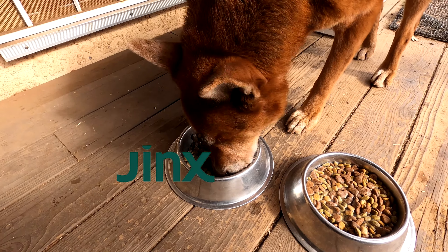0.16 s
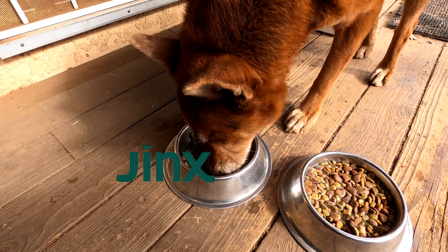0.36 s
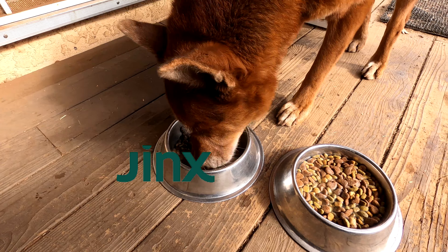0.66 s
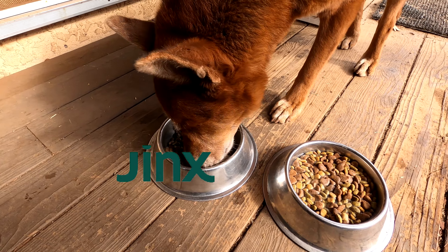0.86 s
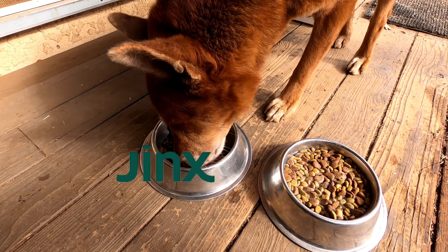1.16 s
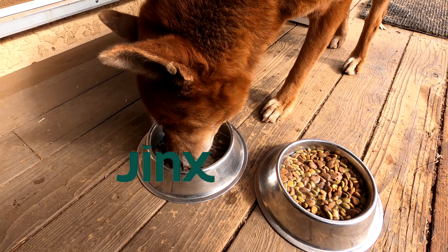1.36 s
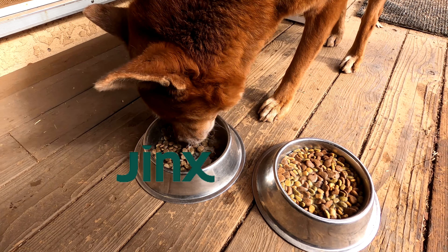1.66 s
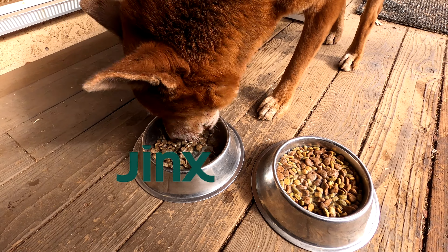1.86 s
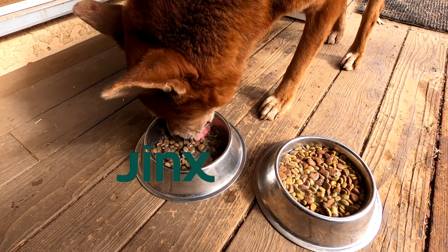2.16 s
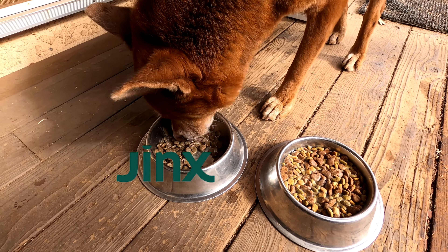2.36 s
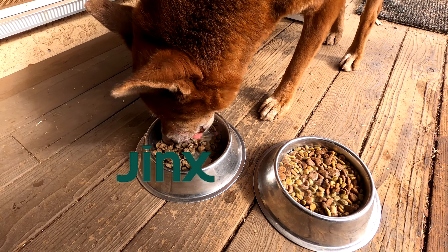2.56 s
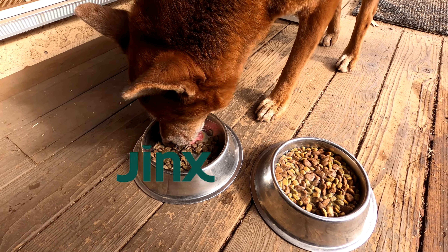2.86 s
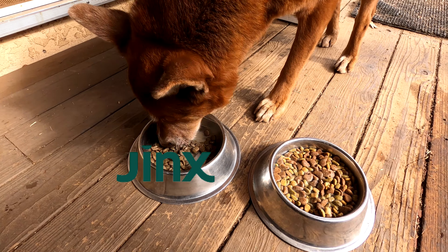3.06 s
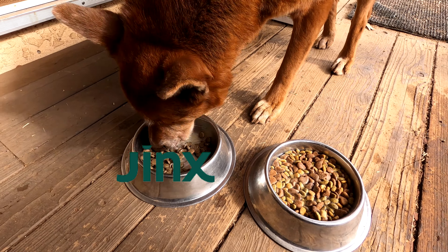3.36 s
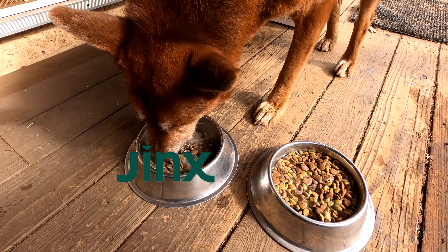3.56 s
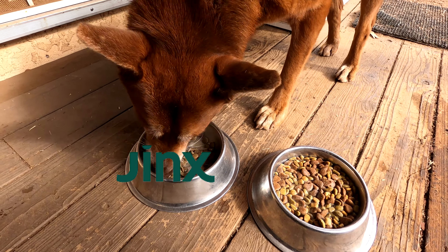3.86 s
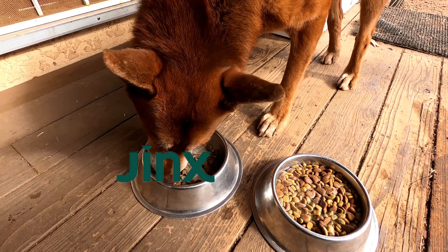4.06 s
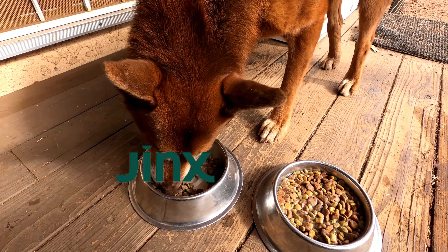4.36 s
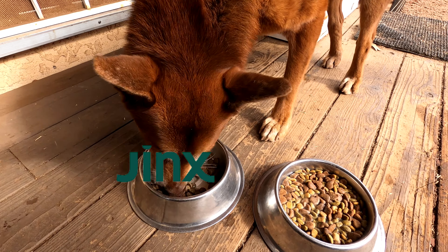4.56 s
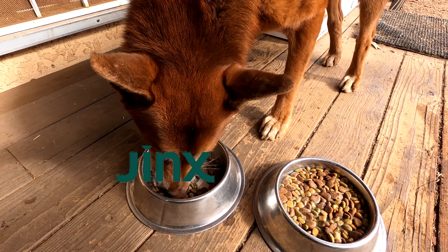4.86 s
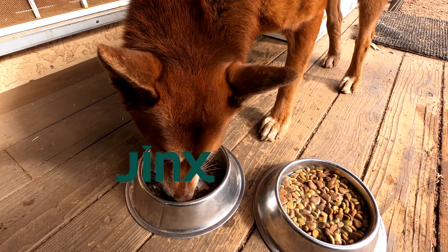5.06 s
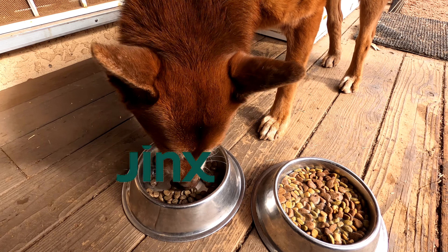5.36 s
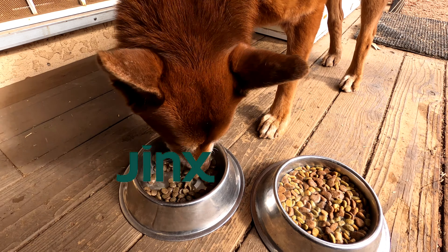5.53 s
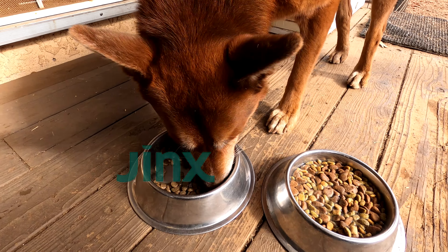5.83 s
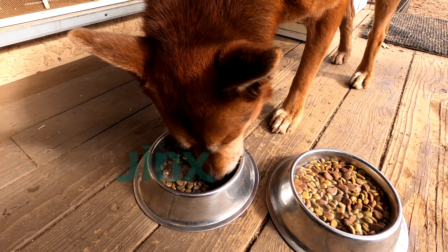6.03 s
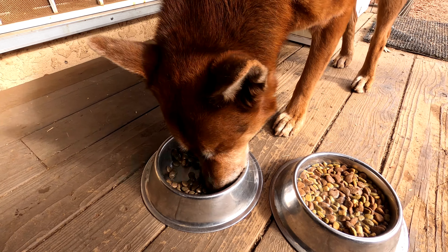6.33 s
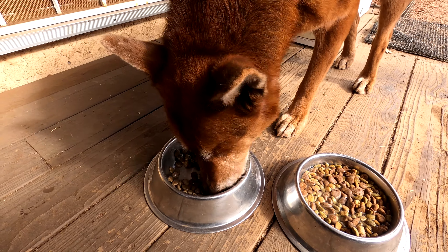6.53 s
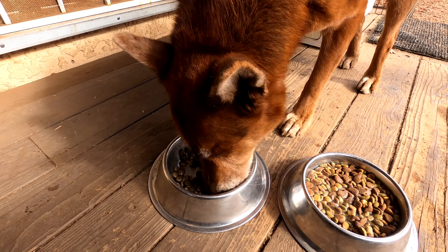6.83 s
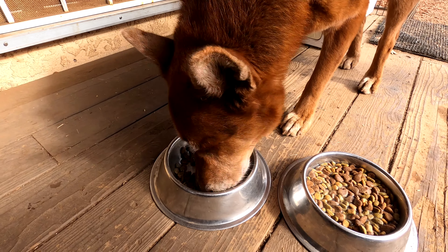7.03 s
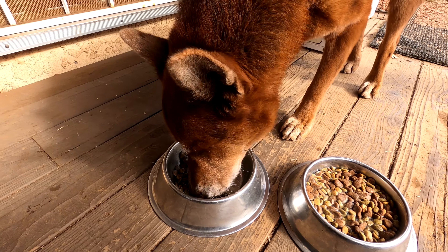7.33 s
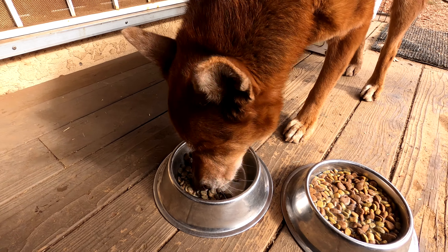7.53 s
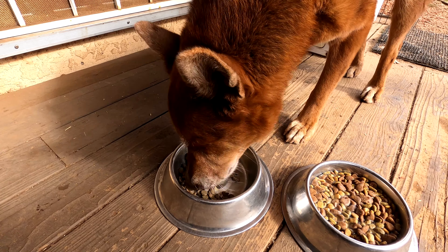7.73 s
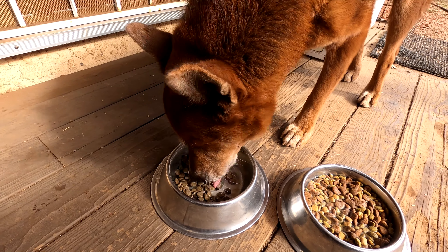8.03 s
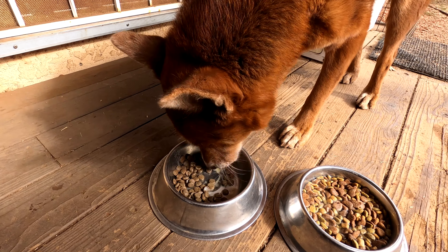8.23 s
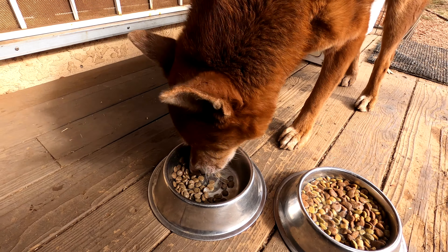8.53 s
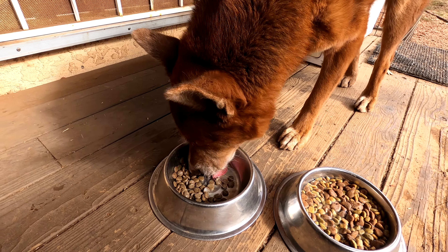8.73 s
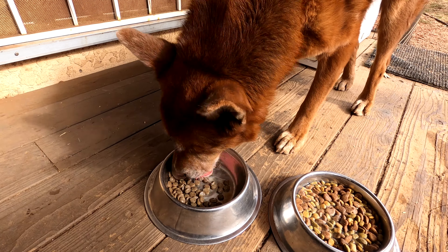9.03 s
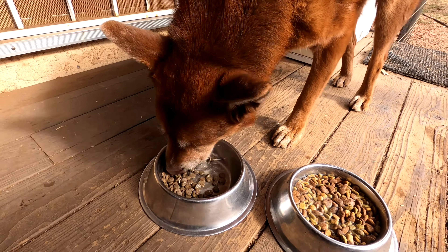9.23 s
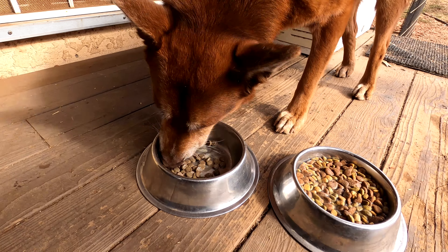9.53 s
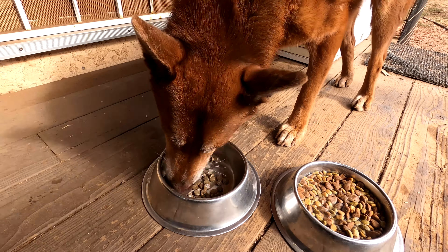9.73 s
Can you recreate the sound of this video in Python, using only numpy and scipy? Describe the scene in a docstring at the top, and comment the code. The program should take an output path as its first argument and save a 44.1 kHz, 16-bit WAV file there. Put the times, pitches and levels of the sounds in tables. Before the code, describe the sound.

Steady, dense chewing at three or four strokes a second, close to the microphone: crushed wet pellets, smacks, brief squeaks and tooth knocks. The dog snuffles into its metal bowl and nudges it softly against the boards. From about five seconds occasional small metallic scrapes appear. Quiet hum and open air continue behind, while draughts swell as deep rumble, strongest near the end.

```python
"""Under everything lie a machine hum, outdoor air and the rumble of a draught on a close microphone.
A dog is already chewing moist kibble from a steel bowl: jaw strokes crunch soaked pellets and fizz saliva.
Soon wet food squeaks, the mouth cavity pops, pellets snap, saliva films tick and teeth knock through pellets.
After a second the nose puffs into the bowl, then the muzzle bumps bowl and boards; later, teeth scrape steel.
The steel rings faintly along with mouth and nose, and muzzle, bowl and deck scatter the dog's sounds."""
import sys
import numpy as np
from scipy import signal
from scipy.fft import rfft, irfft, next_fast_len
from scipy.io import wavfile
from scipy.ndimage import uniform_filter1d

SR = 44100
rng = np.random.default_rng(int(sys.argv[2]) if len(sys.argv) > 2 else 0)


def log_audio(samples):
    """Write samples as a 16-bit WAV file to the path given in sys.argv[1]."""
    # one column per channel
    frames = np.atleast_2d(samples).T
    # limit to full scale, then quantise
    limited = np.clip(frames, -1, 1)
    pcm = np.round(limited * 32767).astype(np.int16)
    wavfile.write(sys.argv[1], SR, pcm)


N = 436149
BLOW = np.arange(SR // 5) / SR  # time axis of one short event (s)
ATTACK = int(.008 * SR)  # the stretch that sets the level of a blow (samples)


def undb(db):
    """Decibels to gain."""
    return 10 ** (np.asarray(db) / 20)


def unit(x):
    """Scale to rms 1."""
    return x / np.sqrt(np.mean(x ** 2) + 1e-20)


def strike(x, db):
    """Scale a blow so that its first 8 ms have the given rms level."""
    return x * undb(db) / np.sqrt(np.mean(x[:ATTACK] ** 2) + 1e-20)


def add(out, s, x):
    """Mix x into out at time s."""
    i = int(np.clip(s * SR, 0, N - 1))
    out[i:i + len(x)] += x[:N - i]


def resonate(x, hz, q):
    """Two-pole resonance with gain 1 at its centre."""
    w = 2 * np.pi * min(hz, SR / 2 - 2000) / SR
    a = np.sin(w) / (2 * q)
    return signal.lfilter([a, 0, -a], [1 + a, -2 * np.cos(w), 1 - a], x + 1e-18)


def resonate_twice(x, hz, q):
    """The same resonance passed twice, for steeper sides."""
    return resonate(resonate(x, hz, q), hz, q)


def colour(x, points):
    """Shape x by a (Hz, dB) spectrum; rms 1."""
    hz, db = np.transpose(points)
    size = next_fast_len(len(x))
    f = np.maximum(np.arange(size // 2 + 1) * SR / size, .1)
    low_cut = np.minimum(f / hz[0], 1) ** 2
    gain = undb(np.interp(np.log(f), np.log(hz), db)) * low_cut
    return unit(irfft(rfft(x, size) * gain, size)[:len(x)])


def fade(t, t60):
    """Exponential decay, 60 dB in t60 seconds."""
    return np.exp(-np.log(1000) * t / t60)


def swell(t, rise, t60):
    """A force that builds over `rise` seconds and dies away."""
    return (1 - np.exp(-t / rise)) ** 2 * fade(t, t60)


def burst(t60):
    """A short dying spray of noise."""
    return rng.standard_normal(len(BLOW)) * fade(BLOW, t60)


def walk(rate):
    """Slow chance with a spread near 1, about `rate` new values a second."""
    k = int(SR / rate)
    return uniform_filter1d(np.repeat(rng.standard_normal(N // k + 1), k), k)[:N]


def grains(spectrum, rate, rise, t60, width, spread_db, count=5000, size=900):
    """A cloud of at most `count` wet bursts, each with its own time, pitch, loudness and length; rms 1."""
    hz, db = np.transpose(spectrum)
    used = min(int(rate * N / SR), count)
    when, where = rng.random((count, 2))[:used].T
    loud, slow, wide = np.clip(rng.standard_normal((count, 3))[:used].T, -2, 2)
    pitch = hz[0] * (hz[-1] / hz[0]) ** where
    # every burst fills its own band, some narrow and bubble-like, some broad
    octaves = np.log2(np.arange(1, size // 2 + 2) * SR / size / pitch[:, None])
    own_width = width * np.exp(.5 * wide[:, None])
    band = 1 / (1 + (octaves / own_width) ** 2) ** 2
    noise = irfft(rfft(rng.standard_normal((count, size))[:used]) * band)
    bursts = noise * swell(np.arange(size) / SR / np.exp(0.49 * slow[:, None]), rise, t60)
    gains = undb(np.interp(pitch, hz, db) + spread_db * loud) / np.linalg.norm(bursts, axis=1)
    out = np.zeros(N)
    for share, gain, one in zip(when, gains, bursts):
        add(out, share * N / SR, gain * one)
    return unit(out)


def sprinkle(rate, level_db, hz, spread_db, octaves, count=300):
    """Chance events that follow a level curve: rows of (start_s, level_db, pitch_hz)."""
    used = min(int(rate * N / SR), count)
    when, loud, pitch = rng.random((count, 3))[:used].T
    at = (when * N).astype(int)
    level = level_db[at] + spread_db * (2 * loud - 1)
    return np.column_stack([at / SR, level, hz * 2 ** (octaves * (2 * pitch - 1))])


def muffle(x, top_hz):
    """Low-pass: closed lips take off the treble."""
    return signal.sosfilt(signal.butter(2, min(top_hz, SR / 3), fs=SR, output="sos"), x)


# partials of the machine hum: pitch_hz [Hz], level_db [dB]
HUM_PARTIALS = [(100.6, -58), (120, -62.5), (150.9, -53), (201.3, -100), (302, -66)]
# relative spectrum of the outdoor air: pitch_hz [Hz], level_db [dB]
AIR_SPECTRUM = [(50, -9), (70, -25.5), (95, -14.5), (135, -22.5), (190, -20.5), (250, -19), (400, -29.5),
                (600, -38), (870, -30), (1300, -42), (2100, -46.5), (8300, -54), (10500, -55), (15500, -57)]


def background(air_db=-50, waver_db=1.0):
    """Hum partials wander slightly in level and phase over a bed of outdoor air noise."""
    t = np.arange(N) / SR
    hum = 0
    for hz, db in HUM_PARTIALS:
        level = np.sqrt(2) * undb(db + waver_db * walk(3.7))
        hum = hum + level * np.sin(2 * np.pi * hz * t + 1.0 * walk(2.085))
    air = undb(air_db + 1.6 * walk(3.8)) * colour(rng.standard_normal(N), AIR_SPECTRUM)
    return hum + air


# draught on the microphone, joined by straight lines: time_s [s], rumble_db [dB]
DRAUGHT_LEVEL = [(0, -43), (1.5, -33.5), (2.6, -50), (3.4, -37.5), (4.4, -30), (5.1, -44.5), (6.2, -37),
                 (7.3, -38), (8.3, -42), (9.0, -22), (9.88, -27.5)]
# gusts that buffet the microphone: peak_s [s], length_s [s], rumble_db [dB]
GUST_EVENTS = [(3.896, 0.098, -24), (4.44, 0.72, -31), (5.632, 0.41, -30.5), (6.244, 0.37, -18.5),
               (6.934, 0.17, -20), (8.669, 0.09, -20.5), (9.434, 0.16, -34)]
# relative spectrum of the rumble: pitch_hz [Hz], level_db [dB]
RUMBLE_SPECTRUM = [(13, -6), (20, 1), (34, -3), (41, -7), (50, -21), (80, -35), (150, -50), (400, -90),
                   (2000, -160)]
# relative spectrum of the slow pressure sway: pitch_hz [Hz], level_db [dB]
SWAY_SPECTRUM = [(1, -6), (6, 1.5), (9, 5.5), (11, 6), (15, -13), (30, -98), (300, -180)]


def draught(sway_db=-18.0):
    """Moving air rumbles on the microphone and swells in gusts, over a slow sway of pressure."""
    time_s, rumble_db = np.transpose(DRAUGHT_LEVEL)
    push = undb(np.interp(np.arange(N) / SR, time_s, rumble_db))
    for s, length, db in GUST_EVENTS:
        add(push, s - length / 2, undb(db) * np.hanning(int(length * SR)))
    rumble = push * colour(rng.standard_normal(N), RUMBLE_SPECTRUM)
    return rumble + undb(sway_db) * colour(rng.standard_normal(N), SWAY_SPECTRUM)


# jaw strokes, three or four a second, each lasting until the next:
# start_s [s], hardest_press_s [s], crunch_db [dB], wet_fizz_db [dB]
JAW_STROKES = [(-0.1, 0, -49, -57), (0.103, 0.25, -51, -62), (0.422, 0.532, -49.5, -59),
               (0.727, 0.792, -48, -61.5), (1.062, 1.172, -52, -61.5), (1.391, 1.438, -49, -56.5),
               (1.684, 1.71, -50, -59.5), (1.984, 2.03, -63, -63.5), (2.218, 2.3, -55.5, -61.5),
               (2.362, 2.51, -51, -58.5), (2.67, 2.95, -51.5, -58.5), (3.042, 3.196, -54, -63),
               (3.35, 3.444, -51, -60.5), (3.641, 3.716, -51, -57.5), (3.97, 4.153, -53.5, -61),
               (4.307, 4.393, -49, -64), (4.59, 4.668, -50, -67), (4.895, 5, -50.5, -60.5),
               (5.194, 5.303, -50.5, -68), (5.436, 5.53, -58.5, -66.5), (5.62, 5.74, -50, -58),
               (6.029, 6.165, -50, -64), (6.25, 6.51, -53.5, -62.5), (6.576, 6.644, -47.5, -63),
               (6.922, 6.94, -47.5, -64), (7.218, 7.272, -48.5, -63.5), (7.52, 7.61, -54.5, -59),
               (7.824, 7.877, -46, -65), (8.252, 8.298, -51, -61), (8.492, 8.688, -56, -61.5),
               (8.692, 8.72, -54, -56.5), (8.904, 9.04, -51, -60.5), (9.21, 9.357, -47, -57),
               (9.507, 9.575, -49, -58), (9.812, 9.883, -60, -53)]


def jaw(attack_s=0.02, release_s=0.039, build_db_per_s=18.5, slacken_db_per_s=35, pause_db=-14.5):
    """Crunch and fizz levels (dB): a stroke grips, builds to its hardest press, slackens and lets go."""
    t = np.arange(N) / SR
    start, press, crunch_db, wet_db = np.transpose(JAW_STROKES)
    k = np.clip(np.searchsorted(start, t) - 1, 0, len(start) - 1)
    since = t - start[k]
    left = np.append(start[1:], np.inf)[k] - t
    grip = np.clip(np.minimum(since / attack_s, left / release_s), 0, 1)
    slack_db = np.maximum(build_db_per_s * (press[k] - t), slacken_db_per_s * (t - press[k]))
    shape_db = pause_db * (1 - grip) - slack_db
    return crunch_db[k] + shape_db, wet_db[k] + shape_db


def debris(rate=600, spread_db=1.5, clump_db=1.5, clumps_per_s=55):
    """Tiny broad-band fractures of the pellets' dry cores, gathered in loud and soft clumps; rms 1."""
    spectrum = [(600, 1.5), (1000, -4), (2500, -7), (4000, -15.5), (5500, -32.0), (8500, -9),
                (10500, -28.5), (15000, -36)]  # (Hz, dB)
    size = undb(spread_db * np.minimum(rng.exponential(size=N), 4))
    cracks = (rng.random(N) < rate / SR) * size * rng.choice([-1, 1], N)
    cracks = cracks * undb(clump_db * np.clip(walk(clumps_per_s), -2, 1))
    return colour(cracks, spectrum)


def chewing(effort_db, wet_db, debris_db=-1.5, debris_share=0.3):
    """Soaked pellets shift and crush, shedding debris, under a finer fizz of saliva bubbles."""
    pellets = [(520, 6.0), (850, 2.5), (1300, -4.5), (1800, -3.0), (2800, -12.5), (4200, -21.0)]  # (Hz, dB)
    bubbles = [(3300, 14.5), (5300, 12.5), (7000, 9.0), (8600, 12.5), (10500, -16), (13000, 15.0),
               (15000, 13)]  # (Hz, dB)
    crunch = grains(pellets, rate=220, rise=0.00052, t60=0.016, width=0.45, spread_db=8.0)
    fizz = grains(bubbles, rate=520, rise=0.00056, t60=0.034, width=0.33, spread_db=9.0)
    breaking_db = debris_share * effort_db + (1 - debris_share) * wet_db
    breaking = debris() * undb(breaking_db + debris_db)
    return crunch * undb(effort_db) + fizz * undb(wet_db) + breaking


def rustle(effort_db, level_db=-7.0, follow=0.65, usual_db=-52):
    """Loose pellets slide over one another around the muzzle; they keep settling between the strokes."""
    rubbing = [(750, -0.5), (1500, 1.5), (2300, 3), (3500, -2.5), (5200, -9.5), (6500, -0.5)]  # (Hz, dB)
    sliding = grains(rubbing, rate=500, rise=0.0015, t60=0.052, width=0.55, spread_db=6.0)
    return sliding * undb(usual_db + follow * (effort_db - usual_db) + level_db)


# wet food squeezed between tongue and steel: start_s [s], length_s [s], pitch_hz [Hz], level_db [dB]
SQUELCH_EVENTS = [(0.244, 0.0064, 3770, -40.5), (0.548, 0.03, 3690, -48.5), (2.83, 0.035, 2450, -57),
                  (3.692, 0.02, 4300, -66), (4.504, 0.034, 3750, -58), (7.658, 0.016, 5120, -43),
                  (7.659, 0.024, 2690, -50), (7.716, 0.03, 5160, -53.5), (8.012, 0.18, 5300, -70),
                  (8.305, 0.007, 1763, -25.5), (8.317, 0.0086, 1910, -55), (9.641, 0.0055, 3820, -38)]


def squelches(wander=0.16, wander_hz=600):
    """Wet food squeaks on a wavering pitch as it is squeezed."""
    out = np.zeros(N)
    for s, length, hz, db in SQUELCH_EVENTS:
        drift = unit(resonate(rng.standard_normal(len(BLOW)), wander_hz, 0.27))
        squeak = np.sqrt(2) * np.sin(2 * np.pi * np.cumsum(hz * (1 + wander * drift)) / SR)
        size = min(int(length * SR), len(BLOW))
        add(out, s, undb(db) * signal.windows.tukey(size, .5) * squeak[:size])
    return out


# the loudest bites and smacks, levels before the trims in bites():
# start_s [s], pop_db [dB], mouth_hz [Hz], snap_db [dB], snap_hz [Hz]
LOUD_BITES = [(0.3434, -73, 294, -50, 3270), (0.44, -46, 1010, -64, 2780), (0.5056, -35, 710, -49.5, 3230),
              (0.555, -39, 1570, -55, 3680), (0.568, -44, 560, -49, 4400), (0.622, -40.5, 1600, -68, 2500),
              (0.689, -41.5, 940, -62, 2510), (0.758, -43, 930, -52, 2500), (0.771, -32, 960, -71, 2600),
              (0.7832, -35.5, 930, -66, 2500), (0.7963, -36.5, 690, -45.5, 4300),
              (0.8571, -34, 1010, -56, 2080), (0.985, -36, 970, -74, 2480), (1.131, -45, 900, -45, 3060),
              (1.171, -55, 1830, -42.5, 2630), (1.2593, -49, 900, -52.5, 2800),
              (1.4232, -38.5, 900, -48, 3030), (1.439, -40, 706, -45.5, 2000),
              (1.7086, -38.5, 744, -49, 5560), (1.763, -36, 890, -45, 4050), (1.9246, -41, 570, -42, 5700),
              (2.0232, -54, 1420, -51, 3200), (2.0298, -35, 787, -46.5, 2980),
              (2.0653, -35, 1400, -47.5, 3830), (2.249, -39.5, 1670, -49, 5600),
              (2.425, -40.5, 1520, -61, 2430), (2.469, -43, 1230, -68, 2500),
              (2.526, -39.5, 690, -74, 3000), (2.5676, -32.5, 856, -57, 2030),
              (2.589, -35.5, 990, -48.5, 3500), (2.616, -52, 900, -54, 3900),
              (2.7458, -28.5, 920, -47, 2900), (2.7992, -39.5, 1300, -66, 2900),
              (2.8259, -38, 1900, -66, 2600), (2.9144, -40.5, 1900, -46.5, 3850),
              (2.9612, -36.5, 1050, -67, 3000), (2.982, -40.5, 640, -62, 3790), (3.08, -45, 780, -63, 2000),
              (3.145, -38, 850, -49, 2240), (3.1606, -30, 612, -55, 3260), (3.186, -44, 1340, -69, 2100),
              (3.253, -44, 1700, -52, 5300), (3.2683, -31, 1550, -58, 2900), (3.2825, -31, 863, -58, 2200),
              (3.394, -45, 1550, -52, 2930), (3.4595, -37.5, 1050, -59, 3200),
              (3.471, -61, 1090, -46, 3450), (3.4916, -35.5, 1070, -44.5, 3300),
              (3.559, -37, 900, -53, 4100), (3.7217, -33.5, 710, -50, 2630), (3.7493, -40, 567, -55, 3100),
              (3.8034, -39.5, 1080, -54, 3400), (3.8117, -39.5, 680, -65, 2500),
              (3.8867, -36, 835, -64, 4140), (3.9, -25.5, 944, -64, 2900), (4.0674, -32.5, 710, -75, 2100),
              (4.121, -43, 910, -61, 2300), (4.1603, -39.5, 680, -68, 2440), (4.17, -34, 610, -68, 4100),
              (4.1966, -35.5, 615, -54, 2250), (4.224, -43, 885, -72, 2500),
              (4.3884, -29.5, 705, -53, 3100), (4.4962, -42, 784, -52, 2500),
              (4.4074, -30.5, 1410, -40, 3630), (4.5418, -56, 740, -47, 3850),
              (4.6774, -27, 630, -35, 2300), (4.722, -41, 620, -70, 2500), (4.795, -48, 710, -51, 2260),
              (4.841, -52, 288, -48.5, 2740), (4.9603, -32.5, 756, -43.5, 2130),
              (4.978, -38, 696, -54, 4200), (5.0745, -31.5, 650, -62, 2600), (5.125, -46, 640, -70, 2950),
              (5.1441, -35.5, 690, -56, 3460), (5.314, -30.5, 986, -49, 2770), (5.505, -43, 860, -56, 4500),
              (5.599, -46.5, 570, -75, 2700), (5.6725, -36, 590, -48.5, 2900),
              (5.724, -28.5, 920, -75, 2800), (5.75, -33, 1280, -47, 3430), (5.9448, -46, 1950, -47, 2620),
              (6.037, -41, 1380, -66, 2100), (6.102, -40, 1860, -47.5, 4120),
              (6.1221, -42, 1800, -43, 2200), (6.1805, -31.5, 1134, -60, 2400),
              (6.288, -46, 1980, -51, 2090), (6.5946, -41, 544, -52, 2170), (6.6238, -44, 700, -62, 2300),
              (6.6465, -33.5, 695, -36, 2040), (6.668, -42, 720, -61, 2100),
              (6.719, -39.5, 1530, -73, 2300), (6.794, -38.5, 1530, -64, 2100),
              (6.8123, -37.5, 1600, -71, 2200), (6.906, -39, 403, -46.5, 2180),
              (6.9493, -40, 460, -54, 2200), (6.977, -33, 690, -57, 2400), (7.001, -49, 1530, -43, 2280),
              (7.056, -44, 680, -48, 1920), (7.178, -43, 1400, -66, 2150), (7.2085, -31, 536, -46.5, 3300),
              (7.293, -38.5, 960, -63, 2200), (7.35, -42, 950, -64, 2580), (7.536, -43, 680, -44.5, 3200),
              (7.5617, -41.5, 740, -54, 2800), (7.576, -55, 1980, -47.5, 2060),
              (7.6288, -42, 910, -70, 2700), (7.6469, -34.5, 867, -48, 2560), (7.719, -35, 875, -52, 4960),
              (7.772, -47, 955, -66, 3300), (7.8962, -34, 780, -46, 2360), (7.921, -32, 570, -63, 3000),
              (7.9346, -25, 1120, -46, 3060), (7.971, -39, 1000, -60, 2800), (8.132, -39.5, 550, -80, 2340),
              (8.203, -45, 630, -77, 2480), (8.2783, -48, 653, -47, 4800), (8.321, -32.5, 640, -67, 2780),
              (8.3996, -38.5, 1300, -44.5, 3640), (8.5494, -32, 610, -49.5, 3340),
              (8.626, -41, 690, -62, 2180), (8.642, -41, 603, -66, 2130), (8.684, -37, 1030, -73, 2900),
              (8.6958, -30.5, 610, -70, 2180), (8.7136, -36.5, 880, -71, 2500),
              (8.769, -46.5, 1895, -56, 2000), (8.837, -36, 805, -76, 2500), (8.996, -37, 750, -62, 2500),
              (9.0106, -34, 1550, -44, 3420), (9.138, -43.5, 770, -56, 2150), (9.232, -46, 732, -65, 2520),
              (9.327, -34, 1150, -51, 2310), (9.334, -27, 837, -50, 2200), (9.347, -42, 1000, -54, 2700),
              (9.3713, -41, 930, -62, 2500), (9.384, -43, 1800, -59, 3400), (9.417, -34.5, 1180, -64, 2500),
              (9.4297, -40, 1710, -61, 2500), (9.444, -39, 1010, -45.5, 2420),
              (9.622, -31, 700, -41.5, 2640), (9.6404, -32.5, 1620, -41.5, 3020),
              (9.6642, -34.5, 790, -69, 2900), (9.732, -43, 1670, -57, 2380)]


def small_smacks(effort_db, snap_db=-22, snap_spread_db=7, snap_hz=2900, snap_octaves=0.1):
    """Lesser smacks of lips and tongue follow the jaw's effort; rows like those of LOUD_BITES."""
    s, db, hz = sprinkle(9, effort_db, 1050, spread_db=2, octaves=0.7).T
    hard, high = rng.uniform(-1, 1, (300, 2))[:len(s)].T
    crack_db = db + snap_db + snap_spread_db * hard
    return list(zip(s, db, hz, crack_db, snap_hz * 2 ** (snap_octaves * high)))


def bites(rows, q=4.8, pop_db=-3, tone_db=-7, pop_rise=0.00041, pop_t60=0.0073,
          crumble=0.039, crumble_t60=0.055, snap_rise=0.00064, snap_t60=0.0062, snap_q=9.1,
          upper_db=-4, upper_hz=3200, edge_db=-4, knock_db=-4, knock_hz=1050, knock_q=3.06):
    """Each bite pops the mouth cavity; the pellet snaps, then crumbles away in a short tail."""
    out = np.zeros(N)
    for s, db, hz, crack_db, crack_hz in rows:
        ring, upper, soft = np.exp(0.324 * rng.standard_normal(3))
        crumbs = crumble * rng.standard_normal(len(BLOW)) ** 3 / 2 * fade(BLOW, crumble_t60)
        force = swell(BLOW, pop_rise * soft, pop_t60 * soft)
        # the collapsing cavity sounds its main resonance; rough contact adds a higher one
        tone = strike(force * np.sin(2 * np.pi * hz * BLOW), tone_db)
        rough = force * rng.standard_normal(len(BLOW)) + crumbs
        pop = strike(resonate(resonate(rough, hz, q * ring), hz, 4.3), 0) + tone
        second_hz = np.sqrt(hz * upper_hz) * upper
        pop += strike(resonate(resonate(rough, second_hz, q), second_hz, 14.0), upper_db)
        # the closing jaws add a broad knock under both
        pop += strike(resonate_twice(rough, knock_hz, knock_q), knock_db)
        crack_force = swell(BLOW, snap_rise * soft, snap_t60 * soft)
        crack = crack_force * rng.standard_normal(len(BLOW)) + crumbs
        snap = resonate(resonate(crack, crack_hz, snap_q), crack_hz, 0.2)
        # the first break is a single broad click
        edge = resonate_twice(1. * (BLOW == 0), crack_hz, 0.81)
        add(out, s, strike(pop, db + pop_db) + strike(snap, crack_db) + strike(edge, crack_db + edge_db))
    return out


def splinters(level_db=-1, spread_db=4, gap_s=.007, hz=1500, octaves=1.0, q=1.15,
              step_db=-12.0, hard_db=-35, count=3):
    """A bitten pellet gives way in steps: a few distinct, dwindling cracks; soft bites hardly splinter."""
    out = np.zeros(N)
    for s, pop_db, _, snap_db, _ in LOUD_BITES:
        bite_db = max(pop_db, snap_db)
        first_db = bite_db + level_db + min(bite_db - hard_db, 0)
        for k, (wait, loud, high) in enumerate(rng.uniform(-1.1, 1, (count, 3))):
            s = s + gap_s * 2 ** wait
            crack = resonate_twice(1. * (BLOW == 0), hz * 2 ** (octaves * high), q)
            crack_db = first_db + spread_db * loud + step_db * k
            add(out, s, undb(crack_db) * crack / np.abs(crack).max())
    return out


def hush(depth_db=-7, length=0.035, loud_db=-35):
    """Just before a loud pop the jaw is pressing, and the small crackle dips."""
    quiet = np.zeros(N)
    for s, db, *_ in LOUD_BITES:
        if db > loud_db:
            add(quiet, s - length, signal.windows.tukey(int(length * SR), .4))
    return undb(depth_db * np.minimum(quiet, 1))


# the loudest saliva films bursting, levels before the trim in ticks():
# start_s [s], level_db [dB], pitch_hz [Hz]
LOUD_TICKS = [(0.479, -49, 13500), (0.749, -53, 8000), (0.863, -54.5, 8700), (1.925, -45, 7900),
              (2.033, -48.5, 7750), (3.139, -51, 7500), (3.165, -53, 7000), (3.189, -49, 8700),
              (3.402, -51, 7800), (4.212, -52.5, 7450), (4.843, -56.5, 8500), (5.087, -51, 8200),
              (7.211, -45.5, 5760), (7.543, -47.5, 7800), (7.79, -52, 7400), (8.292, -52, 13300),
              (8.307, -50.5, 6170), (8.556, -51.5, 6900), (8.749, -59, 8400), (9.121, -52, 6960),
              (9.333, -43, 10400)]


def small_ticks(wet_db):
    """Lesser saliva ticks follow the wet level of the mouth; rows like those of LOUD_TICKS."""
    return list(sprinkle(5, wet_db - 4, 8000, spread_db=11.5, octaves=0.54))


def ticks(rows, level_db=-1, rise=0.000097, t60=0.032, q=5, edge=1.6):
    """Thin films of saliva tear with a sharp edge and a short spray."""
    out = np.zeros(N)
    for s, db, hz in rows:
        spray = resonate(swell(BLOW, rise, t60) * rng.standard_normal(len(BLOW)), hz, q)
        spray[0] += edge
        add(out, s, strike(resonate(spray, hz, 0.89), db + level_db))
    return out


# teeth meet through a hard pellet in one compact knock:
# start_s [s], peak_db [dB], pitch_hz [Hz], resonance_q [no unit]
TOOTH_KNOCKS = [(0.5066, -29.5, 623, 4.8), (0.8564, -26.5, 1700, 1.9), (2.0191, -22, 1510, 4.2),
                (2.066, -33, 1600, 0.8), (2.5681, -23.5, 1700, 1.8), (2.7478, -16, 1410, 0.69),
                (2.8008, -29, 1340, 2), (3.163, -23.5, 604, 2.1), (3.1854, -23.5, 1430, 3.5),
                (3.2705, -34, 2080, 2.2), (3.2808, -13.5, 1030, 1.1), (3.7218, -17, 1980, 0.87),
                (3.7488, -21.5, 514, 1.6), (4.3895, -21.5, 746, 1.2), (4.6775, -24, 2310, 5.5),
                (4.682, -27, 2400, 2.7), (5.0748, -19.5, 940, 0.99), (5.1438, -27, 3320, 2.6),
                (5.3147, -21.5, 1030, 1.8), (6.1022, -23, 4240, 2), (6.1786, -20.5, 1440, 1.8),
                (6.5948, -25, 550, 0.46), (6.9074, -25, 480, 0.75), (7.2085, -25.5, 600, 0.68),
                (7.631, -23, 900, 2), (7.9355, -21, 1200, 0.64), (7.94, -19, 1080, 2.4),
                (9.0127, -24.5, 750, 1.1), (9.6649, -21, 910, 1.55)]


def knocks(crush_db=-17, crush_t60=0.0076):
    """One sharp shove sounds the mouth briefly; the pellet's crumbs give way after it."""
    out = np.zeros(N)
    for s, db, hz, q in TOOTH_KNOCKS:
        force = undb(crush_db) * burst(crush_t60) / 3
        force[0] += 1
        knock = resonate_twice(force, hz, q)
        add(out, s, undb(db) * knock / np.abs(knock).max())
    return out


# puffs through the nose, levels before flutter and mixing:
# start_s [s], length_s [s], hiss_db [dB], low_blast_db [dB]
NOSE_PUFFS = [(1.099, 0.069, -50.5, -75), (1.4, 0.096, -59, -71), (1.906, 0.055, -49, -71),
              (3.081, 0.1, -51.5, -69), (4.292, 0.13, -41, -41.5), (4.625, 0.096, -46, -43.5),
              (4.915, 0.12, -46, -48), (5.2, 0.15, -43, -41.5), (6.581, 0.1, -50, -41.5),
              (6.892, 0.062, -49, -37), (7.182, 0.14, -47, -35.5), (9.189, 0.19, -55, -57.5),
              (9.847, 0.22, -35, -37)]
# relative spectrum of the nostril hiss: pitch_hz [Hz], level_db [dB]
HISS_SPECTRUM = [(500, 3.5), (750, -5.5), (1450, 2), (1900, -6.5), (3000, -14), (3900, -9.5), (6600, -7.5),
                 (7100, -9), (8300, -6), (10500, -12), (13200, -8.5), (15500, -23)]
# relative spectrum of the low blast: pitch_hz [Hz], level_db [dB]
BLAST_SPECTRUM = [(50, 0), (90, 21), (150, -5), (290, 15.5), (450, -2.5), (700, -59), (1400, -1.5),
                  (2500, -17), (9000, -66)]
# resonances of the air trapped between muzzle and bowl: pitch_hz [Hz]
AIR_POCKET_HZ = [3900, 4220, 4720, 5090, 5340, 5800, 6170, 6550, 7030, 8160]


def snuffles(flutter_db=2, skew=0.77, direct_db=-3, pocket_db=3.5, pocket_q=50, spatter_db=-6):
    """Air hisses from wet nostrils, spatters crumbs, sings in the air pocket and blasts the bowl's bottom."""
    hiss, blast = np.zeros(N), np.zeros(N)
    for s, length, hiss_db, blast_db in NOSE_PUFFS:
        # rises faster than it falls
        flow = np.sin(np.pi * np.linspace(0, 1, int(length * SR)) ** skew) ** 2
        add(hiss, s, flow * undb(hiss_db))
        add(blast, s, flow * undb(blast_db))
    jet = hiss * colour(rng.standard_normal(N), HISS_SPECTRUM)
    pocket = sum(resonate(jet, hz, pocket_q) for hz in AIR_POCKET_HZ)
    low = blast * colour(rng.standard_normal(N), BLAST_SPECTRUM)
    air = undb(direct_db) * jet + undb(pocket_db) * pocket + low
    return air * undb(flutter_db * walk(90)) + undb(spatter_db) * hiss * debris()


# muzzle bumps bowl and boards, peaking 6 dB above the level: start_s [s], level_db [dB], pitch_hz [Hz], t60_s [s]
MUZZLE_BUMPS = [(1.598, -32.5, 108, 0.24), (1.61, -42.5, 220, 0.38), (1.685, -44.5, 110, 0.16),
                (3.747, -28.5, 414, 0.033), (3.869, -38, 178, 0.2), (3.884, -34.5, 180, 0.034),
                (6.908, -47, 322, 0.034), (6.975, -38, 287, 0.059), (7.21, -37, 326, 0.04),
                (7.243, -45, 263, 0.13), (7.648, -40, 327, 0.12), (9.617, -38, 278, 0.077),
                (9.759, -43, 200, 0.11)]


def bumps(q=1.8, judder_db=5, judder_hz=60):
    """Soft, dull shoves that reach the deck boards; the bowl judders as it gives way."""
    out = np.zeros(N)
    for s, db, hz, t60 in MUZZLE_BUMPS:
        judder = undb(judder_db * np.clip(walk(judder_hz)[:len(BLOW)], -2, 1))
        thud = resonate(resonate(burst(t60) * judder, hz, q), hz, 0.78)
        add(out, s, undb(db) * 2 * thud / np.abs(thud).max())
    return out


# pitches of the steel bowl's modes: pitch_hz [Hz]
BOWL_MODE_HZ = [662, 905, 1130, 1210, 1446, 1570, 1873, 2466, 2557, 3886, 4222, 4710, 4950, 5071, 5144,
                5340, 5706, 5760, 5857, 6133, 6600, 7708, 8161, 11760]
# one row for each bowl mode, in the same order: relative level_db [dB], t60_s [s]
BOWL_MODES = [(-11, 0.13), (17.5, 0.014), (18, 0.017), (-1, 0.27), (-6, 0.24), (1, 0.26), (-1, .31),
              (-17, 0.4), (-11, 0.64), (0, 0.31), (-7, 0.3), (-11, 0.21), (-26, 0.22), (-12, 0.24),
              (-4, 0.37), (-11, 0.28), (-33, 0.25), (-7, 0.37), (-14, 0.25), (-11, 0.26), (-18, .2),
              (-21, 0.18), (-20, 0.14), (-21, 0.2)]


def bowl_ring(split_hz=9, twin_db=-5):
    """The steel's answer to one tap, energy 1; the uneven load of food splits modes into beating pairs."""
    t = np.arange(SR // 2) / SR
    ring = 0
    for hz, (db, t60) in zip(BOWL_MODE_HZ, BOWL_MODES):
        twin_hz = hz + split_hz * np.sqrt(hz / BOWL_MODE_HZ[0]) * rng.uniform(-0.78, 1)
        pair = np.sin(2 * np.pi * hz * t) + undb(twin_db) * np.sin(2 * np.pi * twin_hz * t)
        ring = ring + undb(db) * fade(t, t60) * pair
    return ring / np.linalg.norm(ring)


# teeth and pellets knock or drag on the steel, level before tone and rasp are mixed:
# start_s [s], ringing_db [dB], contact_s [s], favoured_hz [Hz]
STEEL_SCRAPES = [(5.076, -44.5, 0.006, 1210), (5.079, -49, 0.008, 1570), (5.142, -55, 0.004, 1570),
                 (5.235, -59, 0.05, 1500), (6.181, -54, 0.004, 1450), (7.243, -54, 0.053, 1500),
                 (8.309, -36, 0.0043, 1340), (8.349, -55, 0.0089, 2560), (8.35, -66, 0.005, 5144),
                 (8.352, -42.5, 0.032, 1400), (9.333, -38, 0.018, 1420), (9.336, -57, 0.01, 2480),
                 (9.43, -64, 0.018, 2460)]


def scrapes(favour_octaves=0.08, broad_db=-7, soft_hz=3200, rough=0.67, slip_hz=150, rasp_db=-9):
    """Rough rubbing swells the steel's modes, which ring on; the contact point favours those near one pitch."""
    out, t = np.zeros(N), np.arange(SR // 2) / SR
    pitches = np.array(BOWL_MODE_HZ)
    soft = 1 / (1 + (pitches / soft_hz) ** 3)
    for s, db, length, hz in STEEL_SCRAPES:
        press, modes = 1. * (t < length), []
        for mode_hz, (mode_db, t60) in zip(BOWL_MODE_HZ, BOWL_MODES):
            # uneven stick and slip feeds the swing of each mode
            grit = uniform_filter1d(rng.standard_normal(len(t)), int(SR / slip_hz))
            slips = press * (1 + rough * unit(grit))
            swing = signal.lfilter([1], [1, -fade(1 / SR, t60)], slips)
            modes.append(undb(mode_db) * swing * np.sin(2 * np.pi * mode_hz * (s + t)))
        favour = 1 / (1 + (np.log2(pitches / hz) / favour_octaves) ** 2) ** 2
        near, broad = favour @ np.array(modes), soft @ np.array(modes)
        tone = near / np.abs(near).max() + undb(broad_db) * broad / np.abs(broad).max()
        rasp = press * unit(resonate(rng.standard_normal(len(t)) ** 3, hz, 2.9))
        add(out, s, undb(db) * (np.sqrt(2) * tone + undb(rasp_db) * rasp))
    return out


def scatter(x, t60=0.087, near_db=-6, late_t60=0.039, late_db=-22, centre_hz=950, count=50):
    """Quick reflections between muzzle, bowl and deck; their pattern changes as the head moves."""
    t, out = BLOW, np.zeros(N)
    edges = np.arange(count + 1) * N // count
    for start, end in zip(edges[:-1], edges[1:]):
        near = burst(t60) * (t > .003)
        late = burst(late_t60) * (t > .015)
        echoes = undb(near_db) * near / np.linalg.norm(near) + undb(late_db) * late / np.linalg.norm(late)
        add(out, start / SR, signal.fftconvolve(x[start:end], echoes))
    return resonate(out, centre_hz, 0.98)


def scene(mouth_ring_db=-25, nose_ring_db=-11):
    """Mouth and nose sound inside the bowl; the steel rings along with both."""
    ring = bowl_ring()
    effort_db, wet_db = jaw()
    mouth = chewing(effort_db, wet_db) * hush() + rustle(effort_db) + squelches()
    blows = bites(LOUD_BITES + small_smacks(effort_db)) + knocks() + splinters()
    mouth += muffle(blows, top_hz=6200) + ticks(LOUD_TICKS + small_ticks(wet_db))
    nose = snuffles()
    # the air jet hits the steel directly and drives its low and high modes almost alike
    drive = undb(mouth_ring_db) * muffle(mouth, top_hz=2600)
    drive += undb(nose_ring_db) * resonate(nose, 5300, 0.2)
    dog = mouth + nose + bumps() + signal.fftconvolve(drive, ring)[:N]
    return (dog + scatter(dog) + scrapes() + background() + draught())[None]


def record(dry, top_hz=15850):
    """The sound fades in and out over a few milliseconds, and the recorder cuts the top."""
    gate = signal.windows.tukey(N, .003)
    return signal.sosfilt(signal.ellip(10, .1, 80, top_hz, fs=SR, output="sos"), dry * gate)


dry = scene()
out = record(dry)
log_audio(out)
```